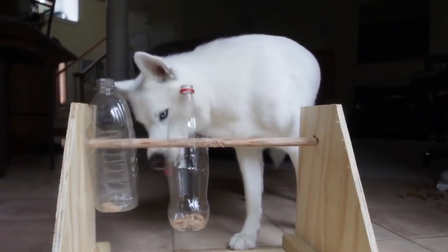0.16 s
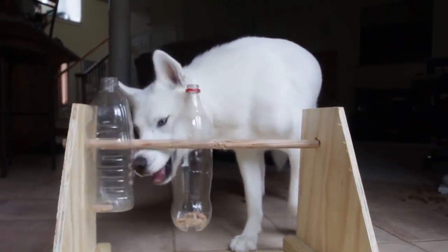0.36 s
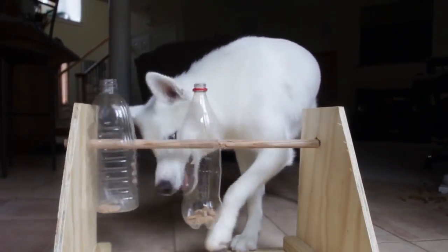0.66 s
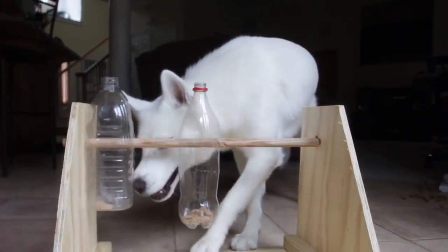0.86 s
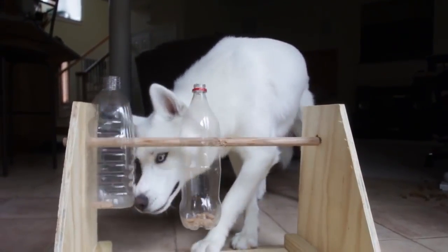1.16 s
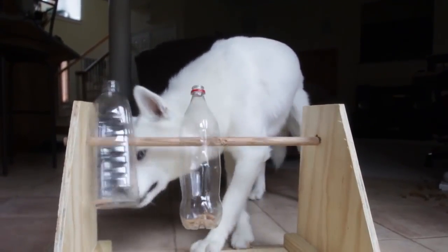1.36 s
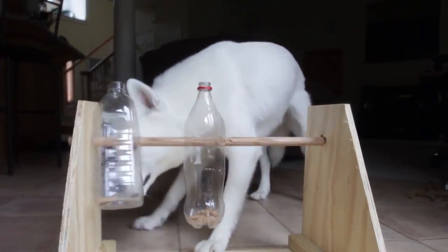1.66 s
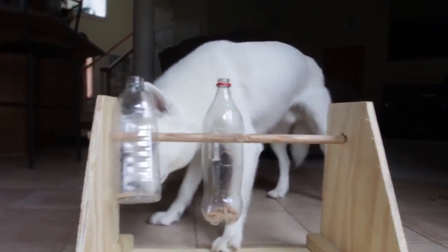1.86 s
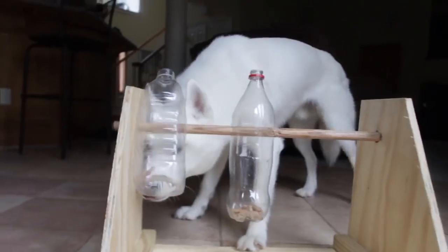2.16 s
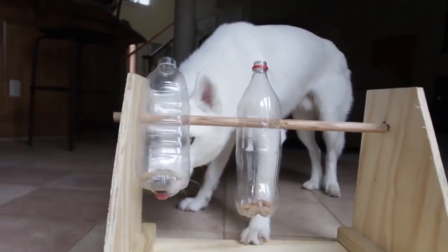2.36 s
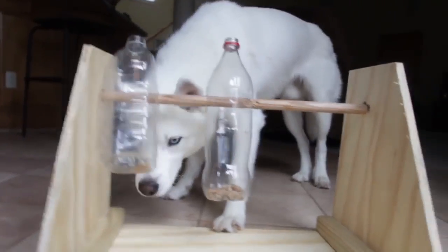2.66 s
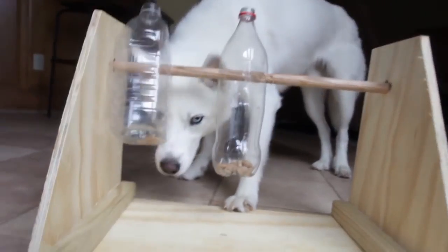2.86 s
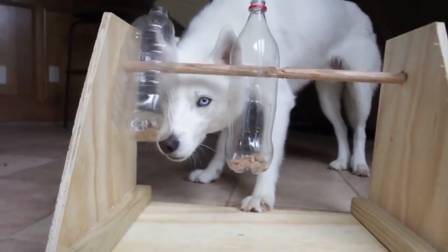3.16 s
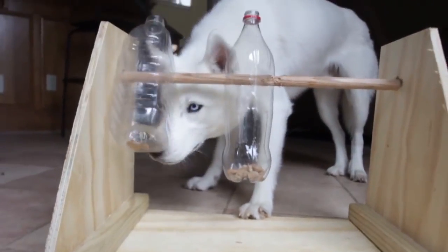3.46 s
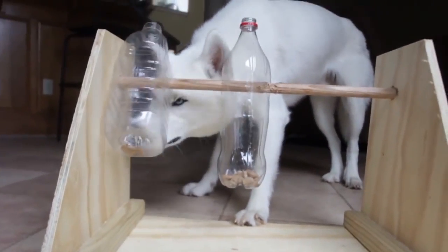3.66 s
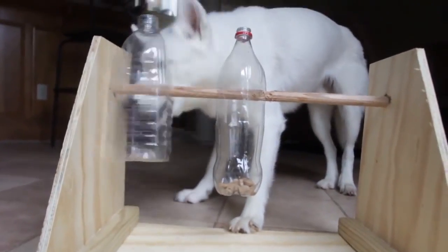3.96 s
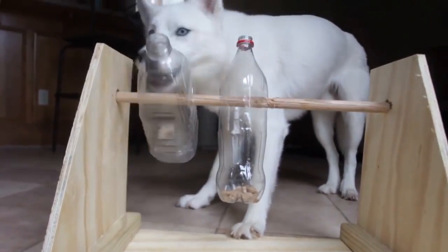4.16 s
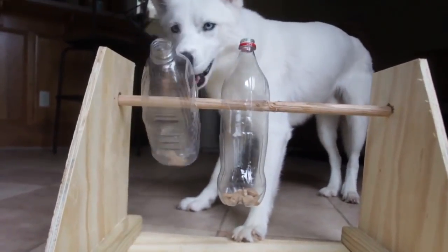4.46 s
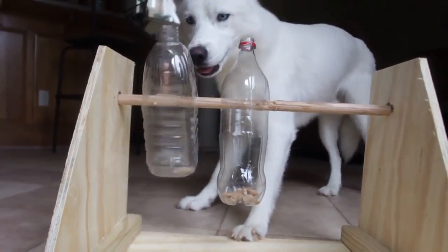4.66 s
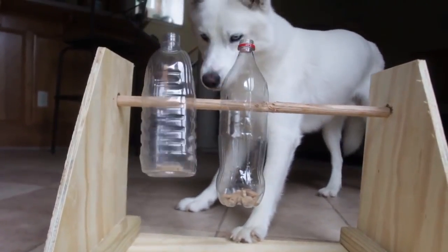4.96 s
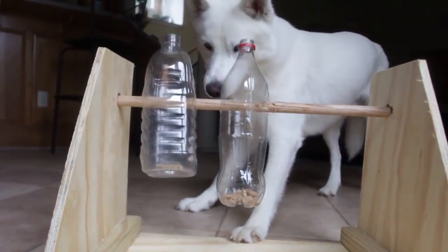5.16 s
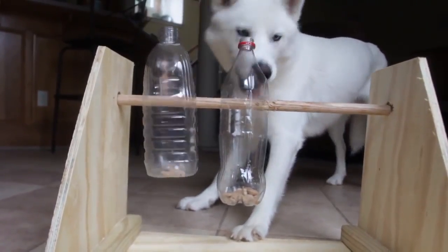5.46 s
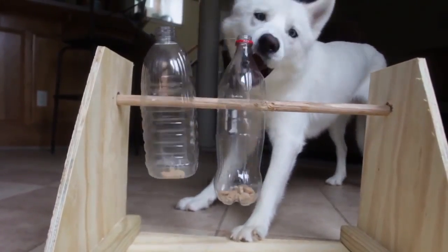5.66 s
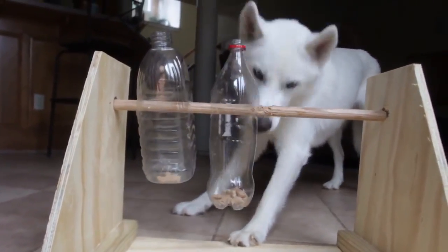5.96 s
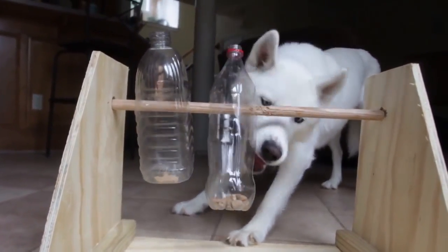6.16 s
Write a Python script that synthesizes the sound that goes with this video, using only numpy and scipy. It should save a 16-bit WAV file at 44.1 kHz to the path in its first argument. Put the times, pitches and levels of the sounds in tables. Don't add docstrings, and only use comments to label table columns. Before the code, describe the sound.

Empty plastic bottles holding a few dry treats are nudged by a dog and swing on a wooden rod. Light clatters come first, then louder hollow thumps and clacks with rattling treats in separate bursts, strongest around the middle. Later only small ticks and soft panting remain. Close microphone in a small tiled room, with low hum and slight handling bumps.

```python
import sys
import numpy as np
from scipy import signal
from scipy.fft import rfft, irfft
from scipy.io import wavfile

SR = 44100
rng = np.random.default_rng(int(sys.argv[2]) if len(sys.argv) > 2 else 0)


def to_linear_factor(level_db):
    exponent = np.asarray(level_db, float) / 20
    return 10 ** exponent


def file_out(sig):
    cols = np.atleast_2d(sig).T
    lim = np.clip(cols, -1, 1)
    pcm = np.round(lim * 32767).astype(np.int16)
    wavfile.write(sys.argv[1], SR, pcm)


N = 278712

# (frequency [Hz], level [dB], t60 [s])
HOLLOW_MODES = [(215, -6.5, 0.11), (250, 0.14, 0.075), (300.7, -1, 0.066), (359.7, -4.5, 0.085)]
# (frequency [Hz], level [dB], t60 [s])
WALL_MODES = [(540, -3.5, 0.079), (600, -5.5, 0.13), (690, -5, 0.051), (780, -9, 0.057), (794, 4.5, 0.017),
              (930, 0, 0.054), (1006.6, 0, 0.047), (1126, 2.5, 0.022), (1216, 1, 0.011), (1397, -5, 0.043),
              (1446, 5, 0.0098), (1650, -0.5, 0.026), (1906, -5.5, 0.025), (2051, -8.5, 0.033),
              (2147, -6, 0.013), (2200, -6.5, 0.011), (2880, -9.5, 0.011), (3280, -12.5, 0.0099),
              (3570, -30, .015), (4160, -41, .015), (4700, -24.5, 0.025)]
# (frequency [Hz], density [dB per Hz])
GRIT_COLOUR = [(350, -47), (900, -1), (1470, 10), (2500, 2), (3720, -8.5), (4050, -6), (5070, -17.5),
               (13100, -39.5), (16000, -42)]
# (time [s], peak [dB], loudest wall pitch [Hz], tick [dB])
ROD_KNOCKS = [(0.3575, -19.5, 910, -26.5), (0.4046, -25, 600, -52), (0.6232, -24.5, 835, -41),
              (0.6468, -24, 2050, -27), (0.672, -21.5, 1050, -36), (0.7393, -27, 920, -65),
              (0.8256, -33.5, 540, -52), (0.891, -26, 640, -34.5), (0.9031, -19.5, 965, -52),
              (1.1743, -33.5, 540, -76), (1.4628, -22, 890, -34.5), (1.5336, -17.5, 1040, -39.5),
              (1.5576, -13, 1023, -38), (1.626, -24, 875, -48), (1.7268, -17.5, 1040, -36.5),
              (1.7879, -20.5, 1420, -50), (2.1707, -9, 946, -18.5), (2.1942, -7.5, 1650, -19.5),
              (2.2858, -14.5, 489, -43), (2.527, -19.5, 1150, -32), (2.5444, -18.5, 600, -33),
              (2.6662, -26, 914, -35.5), (3.1576, -19.5, 780, -38), (3.2008, -10, 628, -26),
              (3.2973, -23, 643, -35.5), (3.546, -33.5, 663, -61), (3.7025, -29.5, 708, -70),
              (4.053, -25.5, 610, -52), (4.4345, -22, 1240, -37), (4.8845, -23, 1100, -48.5)]
# (time [s], peak [dB], loudest wall pitch [Hz], tick [dB])
TREAT_TAPS = [(0.4268, -26, 1260, -34.5), (0.4667, -29, 840, -36.5), (0.5326, -33, 1330, -49),
              (0.9583, -27.5, 940, -40), (1.3282, -36, 1020, -42), (1.4684, -22, 980, -59),
              (1.5438, -17, 587, -49.5), (1.6444, -24.5, 990, -29), (1.7477, -17, 930, -45),
              (2.177, -12, 1040, -30), (2.2246, -20, 577, -58.5), (2.278, -9.5, 1105, -22),
              (2.2984, -15, 980, -31), (2.3523, -26, 1050, -45), (2.4911, -27.5, 1500, -45),
              (2.6023, -24, 890, -44), (2.616, -15, 1610, -57), (2.6838, -21.5, 1990, -39),
              (3.1832, -22, 690, -31), (3.2623, -14.5, 1620, -29), (3.359, -14, 1550, -29),
              (3.971, -15.5, 1204, -40.5), (4.0883, -15.5, 955, -65), (4.1127, -18.5, 990, -30.5),
              (4.2147, -14, 576, -55), (4.4967, -23.5, 1130, -44), (4.5977, -11.5, 1650, -25),
              (4.7033, -29.5, 1030, -59), (4.9685, -25, 1070, -67), (5.8395, -29, 1160, -35.5)]
# (time [s], peak [dB], loudest wall pitch [Hz])
TREAT_BOUNCES = [(0.7163, -28, 780), (0.9111, -20, 1036), (1.26, -40.5, 830), (1.6907, -26.5, 1050),
                 (1.8442, -35, 910), (1.8588, -27.5, 1380), (2.7197, -35, 896), (2.7391, -31.5, 940),
                 (3.242, -18, 710), (3.313, -30, 990), (3.345, -27.5, 980), (4.1744, -20.5, 930),
                 (4.3653, -30.5, 930), (4.834, -33.5, 1030), (5.113, -56, 940), (5.583, -44.5, 600),
                 (5.7316, -42, 1100), (5.7862, -30, 1390), (5.886, -39.5, 1080), (5.918, -35, 890)]


def rms_one(x):
    return x / np.sqrt(np.mean(x ** 2) + 1e-20)


def filtered(x, order, hz, kind="low"):
    return signal.sosfilt(signal.butter(order, hz, kind, fs=SR, output="sos"), x)


def coloured(x, points):
    hz, db = np.transpose(points)
    log_hz = np.log(np.fft.rfftfreq(N, 1 / SR) + 1)
    gain_db = np.interp(log_hz, np.log(hz), db, left=-120, right=-120)
    return rms_one(irfft(rfft(x) * to_linear_factor(gain_db), N))


def ring(clicks, hz, t60_s):
    r = to_linear_factor(-60 / (t60_s * SR))
    w = 2 * np.pi * hz / SR
    return signal.lfilter([0, np.sin(w)], [1, -2 * r * np.cos(w), r * r], clicks + 1e-18)


def grains(per_s, spread_db):
    size_db = spread_db * np.minimum(rng.exponential(1, N), 3.2)
    return to_linear_factor(size_db) * rng.choice([-1, 1], N) * (rng.random(N) < per_s / SR)


def struck(modes, events, focus_db, scatter_db, trim_db, contact_s, rough):
    s, peak_db, pitch_hz = np.transpose(events)[:3]
    at = (s * SR).astype(int)
    chance = rng.standard_normal((len(s), 2 * len(modes)))
    fade = np.exp(-1 / (contact_s * SR))
    slide = rough * rng.standard_normal(N + 97 * len(modes)) * np.sqrt(1 - fade ** 2)
    out = 0
    for k, (hz, level_db, t60_s) in enumerate(modes):
        off_octaves = np.minimum(np.abs(np.log2(hz / pitch_hz)), 1)
        click_db = peak_db + level_db + trim_db - focus_db * off_octaves + scatter_db * chance[:, k]
        clicks = np.zeros(N)
        clicks[at] = to_linear_factor(click_db) * np.sign(chance[:, -1 - k])
        sliding = signal.lfilter([1], [1, -fade], clicks) * slide[97 * k:][:N]
        out = out + ring(clicks + sliding, hz, t60_s)
    return out


def rattled(modes, level_db, per_s):
    trains = [grains(per_s / 3, spread_db=3.0) for _ in range(6)]
    total = sum(to_linear_factor(db) * ring(trains[k % 6], hz, t60_s) for k, (hz, db, t60_s) in enumerate(modes))
    return rms_one(total) * to_linear_factor(level_db)


def cracks(times_s, levels_db, decay_s, colour):
    clicks = np.zeros(N)
    clicks[(times_s * SR).astype(int)] = to_linear_factor(levels_db)
    fade = np.exp(-1 / (decay_s * SR))
    bursts = signal.lfilter([1], [1, -fade], clicks) * rng.standard_normal(N)
    return coloured(bursts, colour) * np.sqrt(np.mean(bursts ** 2))


def swells(rows):
    out = np.zeros(N)
    for s, length_s, level_db in rows:
        shape = np.hanning(int(length_s * SR))
        out[int(s * SR):][:len(shape)] += to_linear_factor(level_db) * shape
    return out


def bottles():
    level_db, bright_db, rock_db = tumble()
    total = thumps() + clacks() + ticks() + treats(level_db, bright_db) + rocking(rock_db)
    return filtered(total, 4, 150, "high")


def thumps():
    # (time [s], peak [dB], pitch [Hz])
    pushes = [(0.43, -24.5, 317), (0.6412, -13.5, 372), (0.699, -19.5, 342), (0.8382, -28.5, 250),
              (0.8952, -14.5, 250), (1.024, -31.5, 236), (1.2624, -28, 256), (1.35, -29, 217),
              (1.4614, -19, 221), (1.5415, -12, 277), (1.616, -15, 362), (1.7297, -26, 247),
              (2.199, -12, 265), (2.2181, -8, 294), (2.2641, -15, 334), (2.3161, -18, 250),
              (2.6211, -33, 260), (3.2106, -6, 250), (3.284, -12, 277), (3.3389, -29, 238),
              (3.3848, -22.5, 267), (3.66, -23, 205), (4.0735, -25, 237), (4.1819, -14.5, 216),
              (4.222, -19, 231), (4.3669, -26, 215), (4.8893, -18.5, 264), (4.933, -23, 272),
              (5.812, -22, 317), (5.856, -17, 280)]
    lag_s, thump_hz = 0.003, 270
    pushes = list(pushes)
    for hits, share_db in ((ROD_KNOCKS, -0.5), (TREAT_TAPS, -12.5), (TREAT_BOUNCES, -1)):
        pushes += [(s + lag_s, db + share_db, thump_hz) for s, db, *_ in hits]
    hollow = struck(HOLLOW_MODES, pushes, focus_db=19.0, scatter_db=0.5, trim_db=0.5,
                    contact_s=0.0063, rough=0.25)
    soft = filtered(hollow, 4, 430)
    return np.roll(soft, -SR // 230)


def clacks():
    bounces = [(s, db, hz, db - 32) for s, db, hz in TREAT_BOUNCES]
    blows = np.array(list(ROD_KNOCKS) + list(TREAT_TAPS) + bounces)
    wall = struck(WALL_MODES, blows, focus_db=5.0, scatter_db=2.0, trim_db=-13,
                  contact_s=0.0046, rough=1.62)
    wall = filtered(wall + own_note(blows), 2, 4000)
    return wall + cracks(blows[:, 0], blows[:, 3] + 0.67, decay_s=0.0073, colour=GRIT_COLOUR)


def own_note(events):
    trim_db, t60_cycles = -2.0, 31.4
    age_s = np.arange(SR // 20) / SR
    out = np.zeros(N + SR // 20)
    for s, peak_db, hz, _ in events:
        cycles = age_s * hz
        shape = to_linear_factor(peak_db + trim_db - 60 * cycles / t60_cycles) * np.minimum(cycles, 1)
        out[int(s * SR):][:len(age_s)] += shape * np.sin(2 * np.pi * cycles)
    return out[:N]


def ticks():
    # (time [s], peak [dB])
    hard_ticks = [(0.713, -46), (1.33, -43), (1.621, -44.5), (1.646, -45.5), (1.7467, -49), (2.1805, -55),
                  (2.1943, -27), (2.2606, -38), (2.278, -33), (2.465, -56.5), (2.543, -43.5), (2.6162, -38),
                  (2.662, -45.5), (2.689, -45.5), (3.171, -50), (3.18, -55), (3.2, -38), (3.3585, -33.5),
                  (3.9316, -52), (4.1017, -42.5), (4.4968, -46), (4.551, -39), (4.5796, -52), (4.599, -26),
                  (4.8057, -46), (4.9244, -37), (5.1145, -55), (5.4088, -61), (5.59, -55), (5.8384, -48)]
    # (time [s], peak [dB])
    faint_claws = [(4.5076, -54), (4.518, -55), (4.5402, -47), (5.4441, -61), (5.5247, -60), (5.5644, -58),
                   (5.605, -58.5), (5.786, -54.5), (5.801, -50.5), (5.857, -63)]
    # (frequency [Hz], density [dB per Hz])
    tick_colour = [(2500, 0), (5500, -0.5), (9000, -7.5), (15500, -16.5)]
    s, peak_db = np.transpose(list(hard_ticks) + list(faint_claws))
    return cracks(s, peak_db - 2.5, decay_s=0.0018, colour=tick_colour)


def tumble():
    # (start [s], length [s], level [dB], brightness [dB])
    swings = [(0.348, 0.12, -32, 3.5), (0.54, 0.13, -49, 8), (0.614, 0.13, -32, 5.5), (0.82, 0.073, -42, 3),
              (0.893, 0.088, -38, 3.5), (1.027, 0.084, -46.5, 5.5), (1.156, 0.071, -47, -4),
              (1.253, 0.33, -48, -10), (1.436, 0.081, -36, -8), (1.522, 0.29, -31.5, 1),
              (1.715, 0.17, -38, 5), (2.168, 0.055, -21.5, 7), (2.284, 0.085, -29.5, 6.5),
              (2.395, 0.15, -40, 3), (2.518, 0.053, -32, 6), (2.646, 0.12, -40.5, 5),
              (3.106, 0.11, -45.5, -18), (3.166, 0.082, -22, 1.2), (3.293, .13, -36, 1),
              (3.53, .04, -44, -6), (3.645, 0.074, -48, -14), (3.97, 0.12, -37.5, 6),
              (4.076, .17, -28.5, 1), (4.288, 0.84, -45.5, -21), (4.592, 0.13, -36.5, -5),
              (4.78, 0.049, -36.5, -1), (4.877, 0.11, -37.5, -21), (5.701, 0.037, -38.5, 4),
              (5.775, 0.11, -37, 1.5)]
    toss_s, sag_db, settle_db_per_s = 0.0086, 5.5, 227.5
    rock_trim_db, rock_db_per_s = -18, 58
    t = np.arange(0, N + 32, 32) / SR
    power = bright = rock = 1e-14
    for s, length_s, level_db, bright_db in swings:
        age_s = t - s
        after_s = np.maximum(age_s - length_s, 0)
        rise = np.clip(age_s / toss_s, 0, 1)
        sagged_db = level_db - sag_db * np.clip(age_s / length_s, 0, 1) - settle_db_per_s * after_s
        share = (to_linear_factor(sagged_db) * rise) ** 2
        power = power + share
        bright = bright + share * to_linear_factor(2 * bright_db)
        rock = rock + (to_linear_factor(level_db + rock_trim_db - rock_db_per_s * after_s) * rise) ** 2
    return [np.interp(np.arange(N) / SR, t, 10 * np.log10(p)) for p in (power, bright, power + rock)]


def treats(level_db, bright_db):
    rattle = rattled(WALL_MODES, level_db - 2.5, per_s=360)
    sand = grains(2200, spread_db=2.0) + 1.1 * rng.standard_normal(N)
    grit = to_linear_factor(bright_db - 14.5) * coloured(sand, GRIT_COLOUR)
    return clumps(45, depth_db=2.5) * (rattle + grit)


def clumps(hz, depth_db):
    slow = filtered(rng.standard_normal(N), 2, hz)
    return rms_one(to_linear_factor(depth_db * rms_one(slow)))


def rocking(rock_db):
    return rattled(HOLLOW_MODES, rock_db + 0.5, per_s=200)


def dog():
    return panting() + hoot() + sniffs()


def panting():
    # (time [s], level [dB], length [s])
    pants = [
        (0.545, -45.5, 0.038),
        (5.466, -49, 0.1),
        (5.672, -53, 0.038),
        (5.941, -49.5, 0.066),
        (6.088, -58, 0.038),
        (6.165, -50, 0.06),
    ]
    # (frequency [Hz], width [Hz], level [dB])
    throat_modes = [(560, 250, -19), (937, 110, -36), (1317, 160, 2.5), (2030, 60, -4), (2340, 22, -2.5),
                    (3200, 63, -58)]
    air, puffs = rng.standard_normal(N), np.zeros(N)
    throat = sum(to_linear_factor(db) * width_hz * ring(air, hz, 2 / width_hz) for hz, width_hz, db in throat_modes)
    for s, level_db, length_s in pants:
        shape = signal.windows.tukey(int(length_s * SR * 1.25), 0.6)
        puffs[int(s * SR):][:len(shape)] += to_linear_factor(level_db) * shape
    return puffs * rms_one(throat)


def hoot():
    # (time [s], pitch [Hz], level [dB])
    blow = [
        [(1.925, 172.8, -66), (1.965, 155, -37.5), (1.985, 166, -37)],
        [(1.985, 156, -37), (2.005, 164, -40), (2.05, 158, -62)],
    ]
    s, pitch_hz, level_db = np.transpose(np.vstack(blow))
    t = np.arange(N) / SR
    pitch_hz = np.interp(t, s, pitch_hz, left=0, right=0)
    level_db = np.interp(t, s, level_db, left=-120, right=-120)
    return np.sqrt(2) * to_linear_factor(level_db) * np.sin(2 * np.pi * np.cumsum(pitch_hz) / SR)


def sniffs():
    # (time [s], level [dB], length [s], centre [Hz])
    hisses = [
        (1.068, -76, 0.061, 8000),
        (1.15, -71.5, 0.095, 7000),
        (1.91, -55, 0.2, 2782),
        (3.626, -70.5, 0.091, 5400),
        (3.817, -73, 0.12, 7860),
        (4.045, -52, 0.17, 3420),
        (0.617, -49.5, 0.067, 4500),
        (5.264, -84, 0.074, 12200),
        (5.423, -72, 0.063, 12300),
    ]
    out = np.zeros(N)
    for s, level_db, length_s, hz in hisses:
        shape = np.hanning(int(length_s * SR * 1.1))
        hiss = filtered(rng.standard_normal(len(shape)), 2, [hz / 1.4, min(hz * 1.4, 16000)], "band")
        out[int(s * SR):][:len(shape)] += to_linear_factor(level_db) * shape * rms_one(hiss)
    return out


def room(x, count=5):
    t60_s, level_db, cut_hz = 0.28, -14, 2600
    age_s = np.arange(SR // 2) / SR
    place = np.arange(N) / SR * 30 % count
    out = 0
    for k in range(count):
        tail = rng.standard_normal(len(age_s)) * to_linear_factor(-60 * age_s / t60_s) * (age_s > 0.004)
        tail = filtered(tail, 1, cut_hz)
        away = np.abs((place - k + count / 2) % count - count / 2)
        share = np.cos(np.pi / 2 * np.minimum(away, 1))
        out = out + signal.fftconvolve(x * share, tail / np.sqrt(np.sum(tail ** 2)))[:N]
    return to_linear_factor(level_db) * out


def frame():
    # (start [s], length [s], level [dB])
    shifts = [
        (1.45, .2, -64),
        (2.15, 0.29, -44),
        (3.1, 0.43, -50),
        (4.05, 0.33, -53),
    ]
    # (frequency [Hz], density [dB per Hz])
    rumble = [(15, -52), (25, -32), (54, -12.5), (80, -8.5), (113, -10), (140, -4), (180, -7.5),
              (310, -120)]
    return (to_linear_factor(-62.5) + swells(shifts)) * coloured(rng.standard_normal(N), rumble)


def handling():
    # (centre time [s], level [dB])
    bumps = [
        (2.549, -49),
        (2.619, -46),
        (2.769, -45),
        (2.859, -51),
        (3.049, -46),
        (3.129, -41),
        (3.379, -49),
    ]
    length_s, top_hz, trim_db = 0.062, 62.5, -3.5
    low = filtered(rng.standard_normal(N), 3, [top_hz / 1.87, top_hz], "band")
    return swells([(s - length_s / 2, length_s, db + trim_db) for s, db in bumps]) * rms_one(low)


def hum():
    # (frequency [Hz], density [dB per Hz])
    air_colour = [(15, -56), (25, -49), (47, -29.5), (121, 16), (142, -1.5), (244, 6), (408, -1),
                  (550, -6.5), (873, -2), (2450, -10), (2880, -10.5), (4820, -25.5), (15100, -35),
                  (16300, -55)]
    return to_linear_factor(-56.5) * coloured(rng.standard_normal(N), air_colour)


def drone():
    # (start [s], length [s], frequency [Hz], width [Hz], level [dB])
    machine = (4.3, 1.3, 102, 30, -66)
    s, length_s, hz, width_hz, level_db = machine
    t = np.arange(N) / SR
    swell = np.clip(np.minimum(t - s, s + length_s - t) / 0.22, 0, 1)
    once = ring(rng.standard_normal(N), hz, 2.2 / width_hz)
    return to_linear_factor(level_db) * swell * rms_one(ring(once, hz, 2.2 / width_hz))


def scene():
    near = bottles() + dog()
    return (near + room(near) + frame() + handling() + hum() + drone())[None]


def band_limit(x):
    return signal.sosfilt(signal.butter(12, 16480, fs=SR, output="sos"), x)


def record(dry):
    rounded = 1.017 * np.tanh(dry / 0.86)
    top = signal.cheby2(16, 50, 16150, fs=SR, output="sos")
    return band_limit(signal.sosfilt(top, rounded))


dry = scene()
out = record(dry)
file_out(out)
```